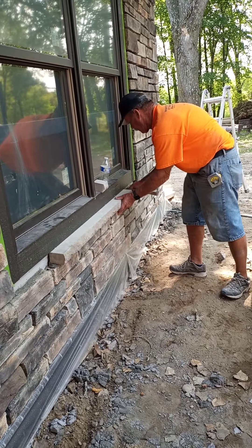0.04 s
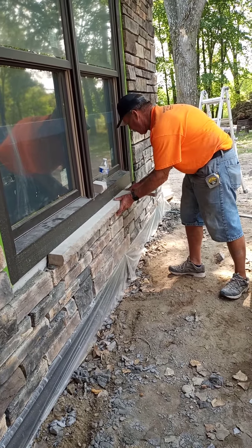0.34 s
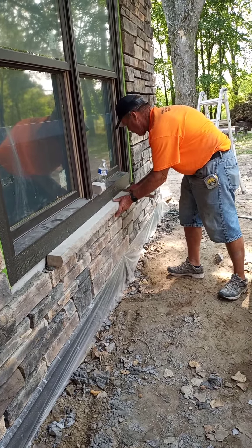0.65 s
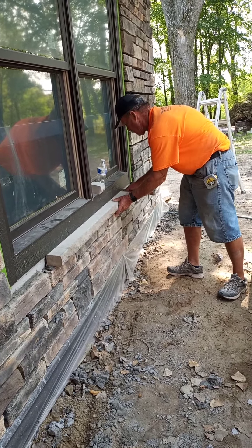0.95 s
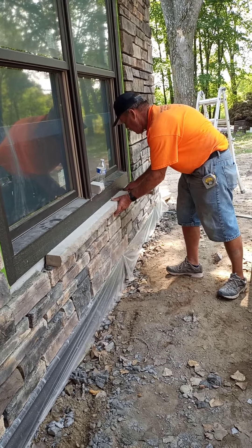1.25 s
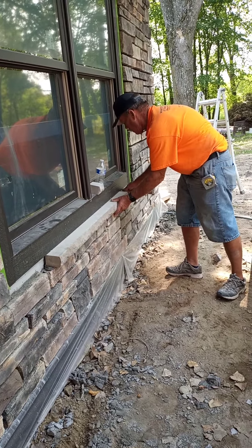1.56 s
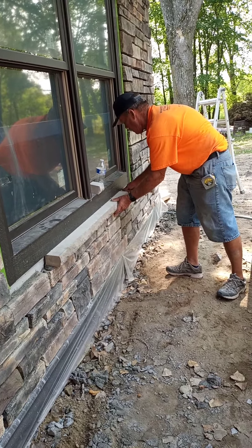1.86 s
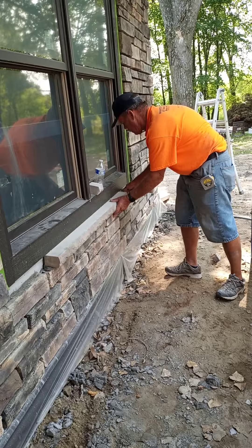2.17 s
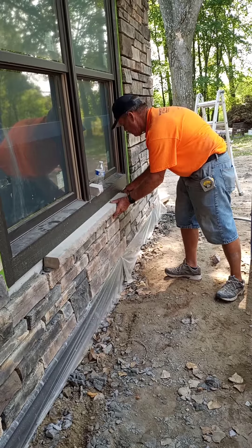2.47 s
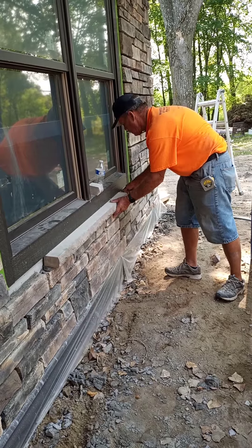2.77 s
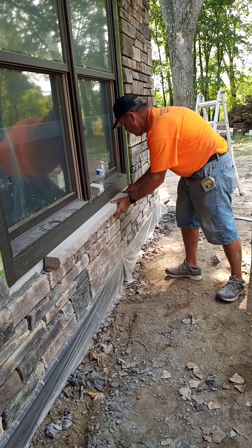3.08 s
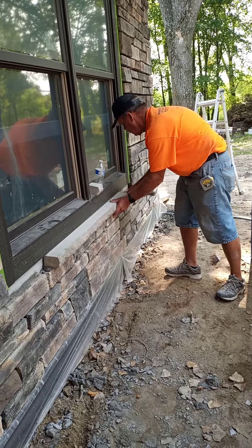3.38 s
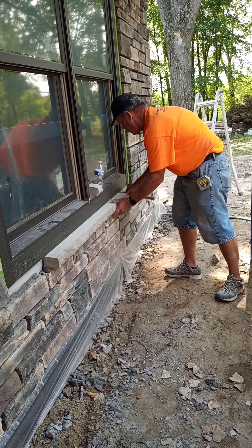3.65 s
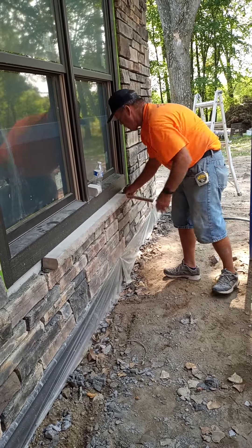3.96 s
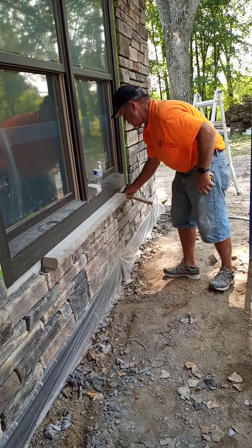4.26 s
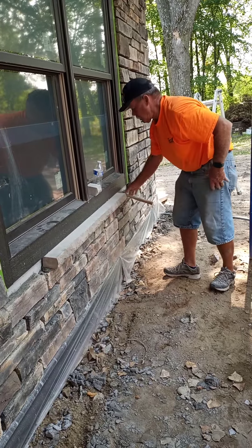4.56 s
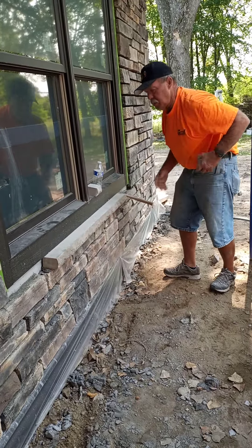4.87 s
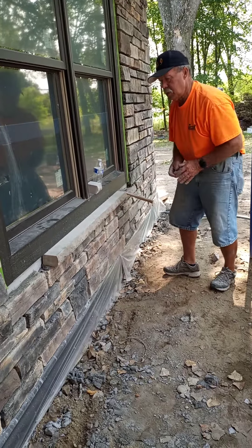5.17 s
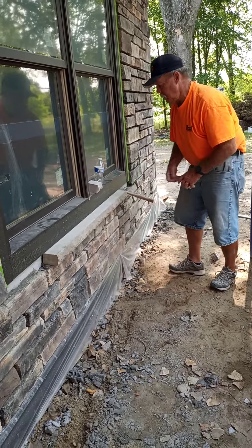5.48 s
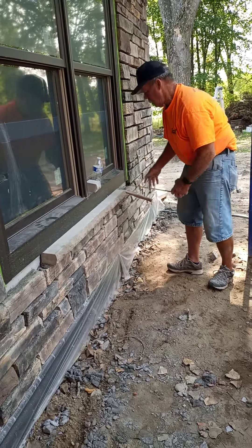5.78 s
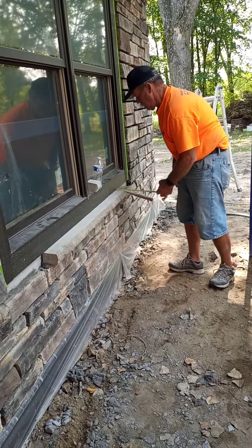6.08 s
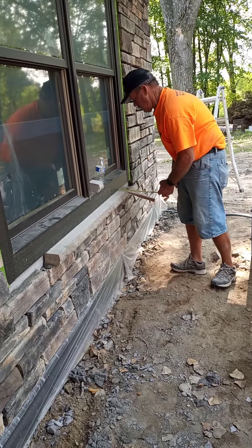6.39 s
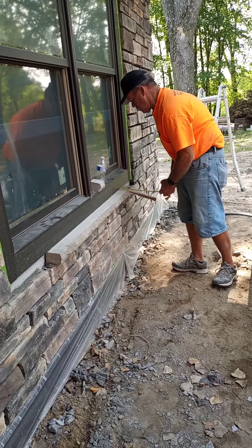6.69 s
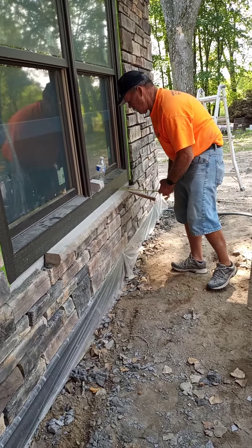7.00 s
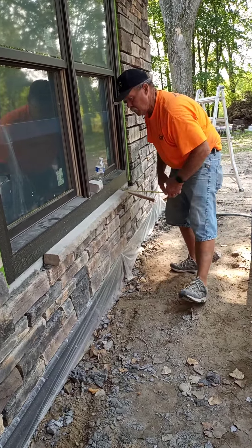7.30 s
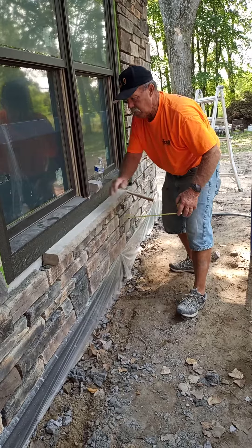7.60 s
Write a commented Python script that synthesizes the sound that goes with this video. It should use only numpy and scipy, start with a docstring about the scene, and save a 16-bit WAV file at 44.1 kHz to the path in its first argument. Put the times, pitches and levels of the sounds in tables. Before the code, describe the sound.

Outdoors beside a house wall, a few metres from the microphone, a hand tool thuds, clacks and scrapes on gritty stone. It pauses, then resumes with clicks, rubbing shoves and one hard, ringing knock before clacking down. Quick rasps and a metallic snap follow from a tape measure, and quiet footsteps shuffle across gravel to the end. A faint insect hiss runs underneath throughout.

```python
"""Insects hiss in the trees as a hand tool scrapes and knocks on a stone window sill, outdoors,
a few metres from one microphone. A mason rocks the tool, shoves it through grit and sets it down with
a clack; the blows thud in the sill, boom in the wall and ring the steel. He draws a tape measure out
in short rasping pulls and steps over gravel. The house front and the trees return a faint tail."""
import sys
import numpy as np
from scipy import signal
from scipy.fft import rfft, irfft, next_fast_len
from scipy.io import wavfile
from scipy.ndimage import uniform_filter1d

SR = 44100
rng = np.random.default_rng(int(sys.argv[2]) if len(sys.argv) > 2 else 0)


def to_wav(sig):
    """Store sig (one row per channel, or 1-D mono) as 16-bit WAV at the path in sys.argv[1].

    Samples outside -1..1 are clipped; the rate is SR.
    """
    pcm = np.clip(np.atleast_2d(sig), -1, 1) * 32767
    pcm = np.round(pcm).astype(np.int16)
    wavfile.write(sys.argv[1], SR, pcm.T)  # frames by channels


N = 341334
T = np.arange(N) / SR
BLOW = T[:8192]  # time axis of one blow

# the sill's low resonances: f/Hz, width/Hz, level/dB
SILL = [(207, 26, -2), (281, 20, -1), (343, 20, 2)]
# the tape blade's resonances: f/Hz, width/Hz, level/dB
BLADE = [(3280, 60, -17), (4030, 120, -12), (4710, 110, -3), (5200, 300, -13), (6305, 45, -1),
         (6620, 200, -5), (6878, 45, 3), (7020, 90, 1), (7220, 40, 4), (7425, 50, -4), (10150, 300, -13),
         (10900, 200, -11), (11420, 70, -5), (14600, 200, -8), (15100, 300, -15), (15380, 130, -9)]
# spectrum of the sliding tape: f/Hz, level/dB
TAPE_COLOUR = [(300, -28), (1300, -21), (2200, -14), (3600, -12), (4700, -8), (5500, -7), (6600, 1.5),
               (7300, -9.5), (8200, -12), (11000, -9), (13300, -17), (15300, -7.5)]


def undb(db):
    """Decibels to gain."""
    return 10 ** (np.asarray(db) / 20)


def unit(x):
    """Scale to rms 1."""
    return x / np.sqrt(np.mean(x ** 2))


def crest(x):
    """Scale so that the loudest 5 ms have rms 1."""
    return x / np.sqrt(uniform_filter1d(x ** 2, size=220).max())


def add(out, s, x):
    """Mix x into out at s seconds."""
    i = int(s * SR)
    out[i:i + len(x)] += x[:len(out) - i]


def colour(x, points):
    """Minimum-phase filter through (f/Hz, level/dB) points."""
    hz, db = np.transpose(points)
    n = next_fast_len(len(x) + len(BLOW), real=True)
    bin_hz = np.arange(n // 2 + 1) * SR / n
    gain = undb(np.interp(np.log(bin_hz + 1), np.log(hz), db))
    cepstrum = irfft(np.log(gain), n)
    cepstrum[1:n // 2] *= 2
    cepstrum[n // 2 + 1:] = 0
    return irfft(rfft(x, n) * np.exp(rfft(cepstrum)), n)[:len(x)]


def resonate(x, peaks, passes=1):
    """Drive (f/Hz, width/Hz, level/dB) resonances, more sharply with each pass; rms 1."""
    for _ in range(passes):
        x = unit(sum(undb(db) * signal.lfilter(*signal.iirpeak(hz, hz / width, SR), x)
                     for hz, width, db in peaks))
    return x


def fade(t, t60):
    """Exponential decay, 60 dB in t60 seconds."""
    return np.exp(-np.log(1000) * t / t60)


def walk(rate):
    """Random drift of rms 1 that turns rate times a second."""
    hold = int(SR / rate)
    levels = np.repeat(rng.standard_normal(N // hold + 1), hold)
    return unit(uniform_filter1d(levels, hold)[:N])


def grains(rate, spread_db):
    """Friction: tiny slips of unequal size, rate a second, each smeared over a few milliseconds."""
    slips = (rng.random(N) < rate / SR) * undb(spread_db * rng.standard_normal(N))
    power = signal.fftconvolve(slips ** 2, fade(BLOW, t60=0.022))[:N]
    return unit(rng.standard_normal(N) * np.sqrt(np.abs(power)))


def stroke(s, length, attack, change_db, release):
    """Envelope of a movement: it builds, changes by change_db over its length, dies (release: t60/s)."""
    t = np.maximum(T - s, 0)
    slope = undb(change_db * np.minimum(t / length, 1))
    return (1 - fade(t, attack)) * slope * fade(np.maximum(t - length, 0), release)


def contact(t60, chatter, rise):
    """One push, then a chatter of small contacts that builds and dies."""
    x = rng.standard_normal(len(BLOW)) * fade(BLOW, t60) * (1 - fade(BLOW, rise))
    x *= chatter / np.linalg.norm(x)
    x[0] += 1
    return x


def ring(modes):
    """Modes (f/Hz, level/dB, t60/s) swell for a moment and decay, a little differently at each strike."""
    tones = np.zeros(len(BLOW))
    for hz, db, t60 in modes:
        strength, detune = rng.standard_normal(2)
        tone = np.cos(2 * np.pi * hz * (1 + 0.00258 * detune) * BLOW)
        tones += undb(db + 2.2 * strength) * fade(BLOW, t60) * tone
    return crest(tones * (1 - fade(BLOW, t60=0.014)))


def reflect(x, share=1):
    """Add the early reflections at the microphone; share sets how strong they are."""
    # off the wall, the ground and the window: delay/s, gain
    reflections = [(.00105, 0.19), (.0029, 0.21), (.0061, .5), (0.01, .15)]
    out = x.copy()
    for s, gain in reflections:
        add(out, s, share * gain * x)
    return out


def wavering(bands, flutter_db, rate):
    """Narrow (f/Hz, width/Hz, level/dB) bands of noise, each fluttering on its own."""
    out = np.zeros(N)
    for hz, width, db in bands:
        band = resonate(rng.standard_normal(N), [(hz, width, 0)], passes=2)
        out += band * undb(db + flutter_db * walk(rate))
    return out


def garden():
    """A far insect chorus and wavering air slowly grow; nearer insects trill, a distant rumble recedes."""
    # spectra of the chorus, the air and the rumble: f/Hz, level/dB
    chorus_colour = [(2500, -34), (4350, -13), (4850, -1), (5350, -7), (6100, -3), (6800, 0), (7450, -3),
                     (8100, -25), (9100, -24), (10400, -17), (11200, -20), (12300, -28), (15000, -22),
                     (16000, -25)]
    air_colour = [(100, -1), (250, 1), (450, -1), (640, -4), (880, 1), (1150, -3), (1800, -3), (3000, -5),
                  (5000, -8), (9000, -26), (15000, -38)]
    rumble_colour = [(20, -47.5), (45, -21), (65, -1), (80, -5), (94, 2), (115, -8.5), (170, -12),
                     (300, -21), (700, -55.5)]
    # the nearer insects, and faint bands relative to the broad air: f/Hz, width/Hz, level/dB
    trill_bands = [(4740, 180, -84.5), (5750, 390, -79.5), (6700, 370, -77)]
    air_bands = [(857, 110, -13), (1440, 180, -17), (1980, 207, -14.5), (2770, 130, -15.5),
                 (3980, 130, -14)]
    chorus = unit(colour(rng.standard_normal(N), chorus_colour))
    chorus *= undb(-70.5 + 1.5 * T + 0.5 * walk(11) + 0.83 * walk(60))
    trills = wavering(trill_bands, flutter_db=2.5, rate=24)
    air = unit(colour(rng.standard_normal(N), air_colour)) + wavering(air_bands, flutter_db=5, rate=9)
    air *= undb(-77.5 + 1.12 * T)
    rumble = unit(colour(rng.standard_normal(N), rumble_colour))
    rumble *= undb(-68.5 - 1.18 * T + 0.5 * walk(1.0))
    return chorus + trills + air + rumble


def chirps(count=480, length_s=0.04, centre_hz=10450, spread_hz=520, fall_hz_per_s=4500):
    """Small insects give thin falling chirps high above the chorus, at random moments."""
    t = T[:int(length_s * SR)]
    swell = np.sin(np.pi * t / length_s) ** 2
    starts = rng.random(count) * T[-1]
    out = np.zeros(N)
    for s, (pitch, size, fall) in zip(starts, rng.standard_normal((count, 3))):
        hz = centre_hz + spread_hz * pitch - fall_hz_per_s * (1 + fall / 2) * t
        add(out, s, undb(-84.5 + 2 * size) * swell * np.sin(2 * np.pi * np.cumsum(hz) / SR))
    return out


def grit():
    """Sand crushes under the tool, sounds its hollow body and makes it sing; scrapes are dull or bright."""
    # t/s, length/s, level/dB, tilt towards the treble/dB, singing/dB
    scrapes = [(0.106, 0.095, -54.5, -1, -76), (0.322, 0.018, -72, -11, -89), (0.438, 0.052, -74, -2, -82),
               (0.565, 0.11, -44.5, -1, -56), (0.674, 0.079, -73, -3, -69), (0.873, 0.029, -52.5, 0, -59),
               (1.637, 0.085, -61, 0.5, -82), (2.577, 0.066, -55, 3.5, -74), (2.947, 0.078, -61.5, 6, -82),
               (3.023, 0.038, -51.5, -9.5, -74), (3.065, 0.016, -53.5, -12.5, -72),
               (3.233, 0.049, -53.5, 1.5, -56.5), (3.3, 0.03, -57, -1, -53.5),
               (3.434, 0.17, -56.5, 0, -62.5), (3.572, 0.37, -62.5, 0.5, -73),
               (3.844, 0.053, -53.5, 0.5, -53), (3.944, 0.08, -66, -8, -74),
               (4.035, 0.3, -58.5, -0.5, -71.5), (4.52, 0.4, -62.5, 2.5, -84)]
    # spectrum of crushed sand: f/Hz, level/dB
    sand_colour = [(100, 4.5), (330, 3), (450, -4), (620, 4), (1000, -2), (1300, -4.5), (2200, -7),
                   (3600, -11), (6500, -2.5), (8200, -25), (10500, -9.5), (13000, -35.5), (15500, -30.5)]
    # resonances of the scraped tool: f/Hz, width/Hz, level/dB
    tool = [(2330, 160, 0), (2700, 450, -3), (3245, 220, -1), (3640, 180, -2), (5600, 400, -8),
            (6065, 160, -3), (6590, 400, -5)]
    crush = grains(rate=2000, spread_db=0)
    hollow = resonate(crush, [(1977, 81, 0), (2200, 47, 0.0015)])
    singing = unit(resonate(crush, tool, passes=2) * undb(3 * walk(45)))
    sand = 0.81 * unit(reflect(colour(crush, sand_colour), share=0.057)) + 0.2 * hollow
    # sand is too light to make bass
    sand = signal.sosfilt(signal.butter(2, 161.4, "high", fs=SR, output="sos"), sand)
    low = signal.sosfilt(signal.butter(1, 1500, fs=SR, output="sos"), sand)
    out = np.zeros(N)
    for s, length, db, tilt_db, sing_db in scrapes:
        force = stroke(s, length, attack=0.069, change_db=-7.5, release=0.16)
        tilted = low * undb(-tilt_db) + (sand - low) * undb(2 * tilt_db)
        out += force * (undb(db) * tilted + undb(sing_db) * singing)
    return out * undb(2.1 * walk(55))


def knocks():
    """The sill thuds and the wall booms under the tool; harder blows add a rap and ring the steel."""
    # t/s, thud/dB, boom/dB, rap/dB, ring/dB
    blows = [(0.118, -38.5, -52, -70, -79), (0.173, -45.5, -53, -55, -78), (.387, -19, -43, -26.5, -67.5),
             (.415, -31, -50, -45, -72), (0.478, -40.5, -62, -72, -80), (0.539, -47, -48, -72, -85),
             (.579, -33.5, -42, -50, -75), (.64, -50, -66, -55, -80), (0.87, -50.5, -48.5, -57.5, -79),
             (3.253, -50, -68, -66, -64), (3.283, -46, -61, -60, -77), (3.312, -42, -74, -72, -57),
             (3.456, -33.5, -41, -75, -72), (3.487, -48, -68, -59, -61), (3.563, -23.5, -58, -28, -32.5),
             (3.711, -44, -53, -63, -81), (3.74, -43, -70, -71, -78), (3.877, -41.5, -64, -55, -72),
             (3.893, -41.5, -51, -53.5, -70), (4.065, -46, -58, -57, -91), (4.117, -49, -51, -69, -82),
             (4.142, -54, -65, -72, -77), (4.181, -51, -66, -73, -75), (4.222, -59, -76, -72, -85),
             (4.278, -55.5, -61, -70, -83), (4.335, -58, -75, -76, -90), (4.373, -55.5, -72, -76, -85)]
    # spectra of the dull and the hard part of a blow: f/Hz, level/dB
    thud_colour = [(30, -62), (50, -39), (72, -17), (120, -8), (200, -3), (270, -2), (350, 0), (430, -7),
                   (560, -20), (1000, -42), (3000, -65)]
    rap_colour = [(200, -20), (380, 1), (480, -1), (570, 0), (680, -5), (790, -2), (890, 1), (1000, -6),
                  (1120, -12), (1320, -20), (1700, -10), (2300, -17), (3300, -30), (7000, -33),
                  (14000, -50)]
    # resonances of the rapped stone and the wall behind it: f/Hz, width/Hz, level/dB
    stone = [(577, 22, -2), (880, 45, 3), (962, 40, 1), (1670, 60, -3)]
    wall = [(72.5, 12, -10.5), (92.6, 12, -1), (116, 18, -0.5), (143.4, 17, -6.5)]
    # the tool rapped hard: f/Hz, level/dB, t60/s
    tool_modes = [(345, 6, .13), (874, -8, .09), (967, -4, .08), (1755, -1, .075), (2336, -11, .1),
                  (3235, -11, .09), (3618, -19, .09), (6062, -13, .09)]
    out = np.zeros(N)
    for s, thud_db, boom_db, rap_db, ring_db in blows:
        push = colour(contact(t60=0.1, chatter=0.75, rise=0.0059), thud_colour)
        thud = crest(crest(push) + 0.17 * crest(resonate(push, SILL)))
        boom = crest(resonate(push, wall, passes=2))
        rap = colour(contact(t60=0.072, chatter=3.8, rise=0.0071), rap_colour)
        rap = crest(reflect(rap, share=0.025))
        rap = crest(rap + 0.4 * crest(resonate(rap, stone)))
        blow = undb(thud_db) * thud + undb(rap_db) * rap
        add(out, s - 0.004, undb(-16.5) * blow)  # a faint lead-in softens the attack
        add(out, s, blow + undb(ring_db) * ring(tool_modes) + undb(boom_db) * boom)
    return out


def clacks(ring_db=-16, ping_s=4.823, ping_db=-60):
    """Sharp clacks and clicks of the tool and the tape measure: hollow body, bright edge, brief ring."""
    # t/s, body/dB, body centre/Hz, edge/dB, t60/s
    hits = [(.172, -52, 2240, -49.5, 0.099), (0.388, -39, 1620, -76, 0.032), (.402, -40, 610, -80, 0.065),
            (.431, -44, 550, -80, 0.13), (0.455, -69, 2090, -70, .05), (0.5742, -28, 2040, -34.5, 0.083),
            (.637, -41.5, 1950, -43.5, 0.049), (.662, -52, 2140, -53, 0.044),
            (0.875, -47.5, 1650, -50.5, 0.08), (2.563, -59.5, 2470, -52, 0.091),
            (2.585, -53, 2330, -47, 0.078), (2.613, -52.5, 2290, -51.5, 0.3), (2.85, -49, 2300, -47.5, 0.1),
            (2.894, -58, 1840, -49.5, 0.1), (2.907, -47.5, 2260, -46.5, 0.078),
            (2.987, -55, 1480, -60, 0.12), (3.037, -48.5, 960, -53, 0.098), (3.076, -53, 754, -70, 0.1),
            (3.358, -44.5, 2700, -54.5, 0.018), (3.359, -53, 1080, -70, 0.052),
            (3.496, -55, 3170, -56, 0.03), (3.558, -41, 1610, -66, 0.065), (4.522, -58, 2210, -61, 0.047),
            (4.721, -50, 940, -56, 0.12), (4.73, -30, 1650, -47, 0.075), (4.733, -30, 1930, -29, 0.083),
            (4.738, -54, 607, -65, 0.11), (4.822, -55, 4900, -53, 0.06), (5.03, -45, 4570, -33.5, 0.079),
            (5.246, -44.5, 2670, -50, 0.1), (5.341, -43.5, 2060, -49.5, 0.077),
            (5.61, -56, 1630, -58.5, 0.046), (5.682, -57, 3300, -47, 0.05),
            (5.9915, -47, 4630, -38.5, 0.027), (6.007, -57, 2600, -43, 0.067),
            (6.054, -55.5, 1710, -54, .05), (6.061, -59, 830, -46, 0.074), (6.088, -65, 650, -74, .07),
            (6.238, -59.5, 6230, -57, 0.024), (7.245, -60, 1510, -54, 0.073)]
    # spectrum of the body: multiple of its centre, level/dB
    body_shape = [(.1, -44), (.22, -35), (.33, -16), (.55, -21), (.8, -8), (.95, 0), (1.07, -1),
                  (1.22, -12), (1.42, -12), (2, -20), (4, -37), (8, -50)]
    # spectrum of the edge: f/Hz, level/dB
    edge_colour = [(1000, -30), (3000, -15), (4200, -10), (4900, -2), (5700, -5), (6700, 0), (7400, -4),
                   (8200, -17), (10200, -10), (13300, -21), (15300, -16)]
    # the tool dropped loose on the stone: f/Hz, level/dB, t60/s
    tool_modes = [(1457, 1, .1), (1622, -3, .14), (1790, -3, .08), (1874, 0, .1), (1982, 1, .13),
                  (2140, -7, .1), (2412, -10, .1), (3552, -5, .17), (4770, -6, .1), (5160, -8, .09),
                  (6304, -7, .11)]
    out = np.zeros(N)
    for s, body_db, centre_hz, edge_db, t60 in hits:
        body_colour = [(multiple * centre_hz, db) for multiple, db in body_shape]
        body = colour(contact(t60, chatter=2.0, rise=0.0014), body_colour)
        edge = colour(contact(t60, chatter=2.5, rise=0.002), edge_colour)
        ringing_body = crest(reflect(body, share=0.043)) + undb(ring_db) * ring(tool_modes)
        add(out, s, undb(body_db) * ringing_body + undb(edge_db) * crest(reflect(edge)))
    # the steel pings faintly as the tool settles
    add(out, ping_s, undb(ping_db) * ring([(3550, -5, 0.12), (4000, 0, 0.16)]))
    return out


def rubbing(judder_width_hz=40, bump_db=3.5, bumps_per_s=55):
    """With each shove the tool sticks and slips, shaking the sill and juddering at a pitch of its own."""
    # t/s, length/s, shake/dB, judder/dB, judder f/Hz
    shoves = [(0.452, 0.036, -58, -58, 300), (0.583, 0.16, -50, -56, 290), (0.666, 0.064, -58, -57, 410),
              (0.852, 0.052, -43.5, -49, 210), (3.238, 0.055, -51, -52.5, 353.5),
              (3.487, 0.061, -47, -47.5, 256), (3.569, 0.063, -43, -46, 320),
              (3.692, 0.055, -38.5, -44.5, 141.8), (3.812, 0.035, -65, -53, 344.3),
              (3.848, 0.056, -52, -42.5, 343), (3.957, 0.064, -50.5, -58, 253.7),
              (4.07, 0.38, -52.5, -60.5, 199.8), (4.43, 0.039, -74, -60, 289)]
    # spectrum of the rubbed stone: f/Hz, level/dB
    rub_colour = [(50, -30), (120, 15.5), (220, 10), (345, 8), (430, -24.5), (550, -35.5), (900, -10),
                  (1300, -32), (4000, -48)]
    slips = grains(rate=1100, spread_db=-3.5)
    shake = 0.5 * unit(colour(slips, rub_colour)) + 0.17 * resonate(slips, SILL, passes=2)
    phase_drift = np.pi * judder_width_hz * np.cumsum(walk(bumps_per_s)) / SR
    bumps = undb(bump_db * walk(bumps_per_s))
    out = np.zeros(N)
    for s, length, db, judder_db, hz in shoves:
        judder = np.sin(2 * np.pi * hz * T + phase_drift)
        force = stroke(s, length, attack=0.029, change_db=-5.5, release=0.061)
        out += (undb(db) * shake + undb(judder_db) * judder) * force
    return out * bumps


def rustles():
    """Fine friction comes in short, faint, bright swells."""
    # middle t/s, length/s, level/dB
    swells = [(1.123, 0.035, -65.5), (1.339, 0.027, -61), (1.903, 0.013, -59), (5.025, 0.03, -52),
              (6.467, 0.073, -59), (6.877, 0.094, -59), (7.251, 0.017, -46.5), (7.565, 0.029, -54.5),
              (7.602, 0.033, -58), (7.711, 0.015, -45.5)]
    # spectrum of a rustle: f/Hz, level/dB
    rustle_colour = [(1000, -30), (4000, -6), (5000, -8.5), (6700, 7.5), (8200, -12.5), (10500, -0.5),
                     (13000, -17.5), (15300, -6.5)]
    envelope = sum(undb(db) * np.exp(-2 * ((T - s) / length) ** 2) for s, length, db in swells)
    return envelope * unit(colour(grains(rate=3200, spread_db=3), rustle_colour))


def cracks():
    """Single grains of sand give way under the tool with tiny dry ticks."""
    # t/s, level/dB
    ticks = [(3.238, -62), (3.365, -53), (3.446, -65), (3.502, -59), (3.562, -57), (3.607, -60),
             (3.622, -60), (3.735, -52), (3.856, -61), (3.968, -54.5), (4.127, -67), (4.164, -69)]
    # spectrum of a tick: f/Hz, level/dB
    tick_colour = [(1500, -20), (4500, 0), (7000, 2), (8300, -12), (10500, 2), (13300, -14), (15300, -2)]
    out = np.zeros(N)
    for s, db in ticks:
        tick = colour(contact(t60=0.084, chatter=2.1, rise=0.002), tick_colour)
        add(out, s, undb(db) * crest(reflect(tick)))
    return out


def steps(thump_delay_s=0.0097):
    """Soles scuff and drag over gravel, and the weight follows with a soft thump into the soil."""
    # t/s, length/s, scuff/dB, thump/dB, drag/dB
    footfalls = [(3.931, 0.085, -64.5, -66, -53.5), (4.542, .09, -79, -85, -65),
                 (4.916, 0.25, -60, -85.5, -80), (5.23, 0.023, -54, -78, -54.5),
                 (5.313, 0.075, -51.5, -73, -53), (5.427, 0.61, -63.5, -79.5, -80),
                 (6.031, 0.029, -58.5, -70, -63), (6.156, 0.71, -69, -79.5, -89),
                 (6.588, 0.29, -67, -92, -88.5), (6.851, 0.38, -61.5, -80, -70.5),
                 (7.216, 0.098, -59, -62, -62.5), (7.331, 0.67, -62.5, -62.5, -64.5),
                 (7.52, 0.094, -60.5, -71, -58.5), (7.629, 0.18, -68, -61, -72)]
    # spectra of loose gravel, a dragging sole and packed soil: f/Hz, level/dB
    gravel_colour = [(100, -5), (220, -5.5), (350, -16), (600, -17), (780, 0), (960, -10.5), (1250, -5),
                     (2200, -0.5), (3600, 0), (5600, -3), (6700, 4), (8200, -20), (10500, -5), (15500, -30)]
    sole_colour = [(150, -24), (450, -8), (650, -9.5), (900, 5.5), (1200, -4), (2200, -5), (4500, -28)]
    soil_colour = [(30, -31), (75, 1.5), (130, -6), (250, -13.5), (500, -21), (2000, -53)]
    scuff, drag, thumps = np.zeros((3, N))
    for s, length, scuff_db, thump_db, drag_db in footfalls:
        scuff += undb(scuff_db) * stroke(s, length, attack=0.089, change_db=-3.5, release=0.56)
        drag += undb(drag_db) * stroke(s, length, attack=0.09, change_db=-5.5, release=0.13)
        thump = colour(contact(t60=0.34, chatter=4.9, rise=0.02), soil_colour)
        add(thumps, s + thump_delay_s, undb(thump_db) * crest(thump))
    gravel = unit(colour(grains(rate=3200, spread_db=-0.5), gravel_colour))
    sole = unit(colour(grains(rate=830, spread_db=1.5), sole_colour))
    return (gravel * scuff + sole * drag) * undb(1.1 * walk(50)) + thumps


def tape_pulls(whine_width_hz=1100, whine_db=-17):
    """The blade gathers speed and rasps through the mouth of its case, at a new pitch with each pull."""
    # t/s, length/s, starting level/dB, whine f/Hz
    pulls = [(4.982, 0.05, -48, 4560), (5.342, 0.08, -54.5, 2440), (5.433, 0.017, -46.5, 2800),
             (5.477, 0.069, -49, 2300), (5.544, 0.041, -49, 2860), (5.6, 0.049, -50, 2620),
             (5.676, 0.033, -49.5, 3170), (5.723, 0.012, -46.5, 4600)]
    slips = grains(rate=9000, spread_db=3) * undb(0.8 * walk(130))
    rasp = 0.97 * unit(reflect(colour(slips, TAPE_COLOUR), share=0.42)) + 0.22 * resonate(slips, BLADE)
    out = np.zeros(N)
    for s, length, db, hz in pulls:
        whine = undb(whine_db) * resonate(slips, [(hz, whine_width_hz, 0)], passes=2)
        out += undb(db) * stroke(s, length, attack=0.049, change_db=5, release=0.093) * (rasp + whine)
    return out


def tape_jerk(s=5.9908, length_s=0.031, catches_per_s=282, steel_db=-34.5, case_db=-63.5):
    """The jerked blade catches in rapid succession, the steel sings on and the case knocks lightly."""
    case_peaks = [(100, 35, -1), (418, 70, 0)]  # f/Hz, width/Hz, level/dB
    catches = 1 + 0.5 * np.cos(2 * np.pi * catches_per_s * (T - s))
    envelope = stroke(s, length_s, attack=0.004, change_db=-1, release=0.045)
    force = envelope * catches * rng.standard_normal(N)
    steel = crest(resonate(force, BLADE)) + 0.13 * crest(colour(force, TAPE_COLOUR))
    case = crest(resonate(force, case_peaks, passes=2))
    return undb(steel_db) * steel + undb(case_db) * case


def yard(x, t60, wet_db):
    """House front and trees scatter a faint, duller tail back to the microphone."""
    t = T[:SR]
    scatter = rng.standard_normal(SR) * fade(t, t60) * (1 - fade(t, t60=0.01))
    tail = colour(scatter, [(100, 10), (2000, 5.5), (6000, 4), (15000, -0.5)])
    return x + undb(wet_db) * signal.fftconvolve(x, tail / np.linalg.norm(tail))[:N]


def scene():
    """The mason a few metres off and the garden beyond, in mono."""
    contacts = knocks() + clacks() + rubbing() + grit() + cracks()
    work = contacts + tape_pulls() + tape_jerk() + steps() + rustles()
    return (yard(work, t60=0.42, wet_db=-15.5) + garden() + chirps())[None]


def record(dry):
    """The recorder cuts the top treble steeply."""
    top_hz = 15720
    return signal.sosfilt(signal.ellip(10, 0.2, 70, top_hz, fs=SR, output="sos"), dry)


dry = scene()
out = record(dry)
to_wav(out)
```